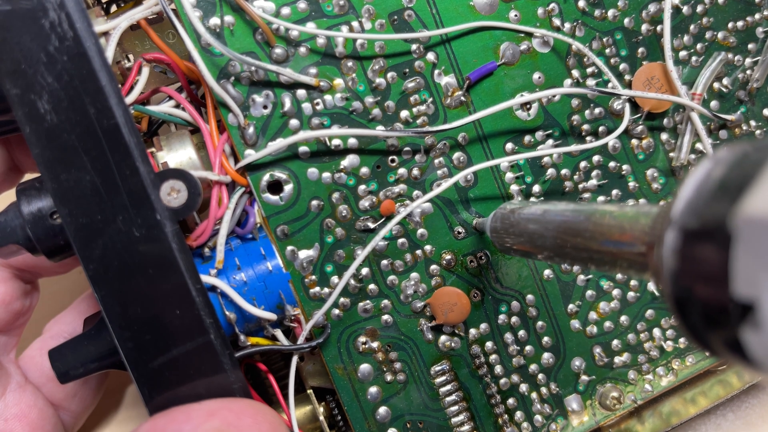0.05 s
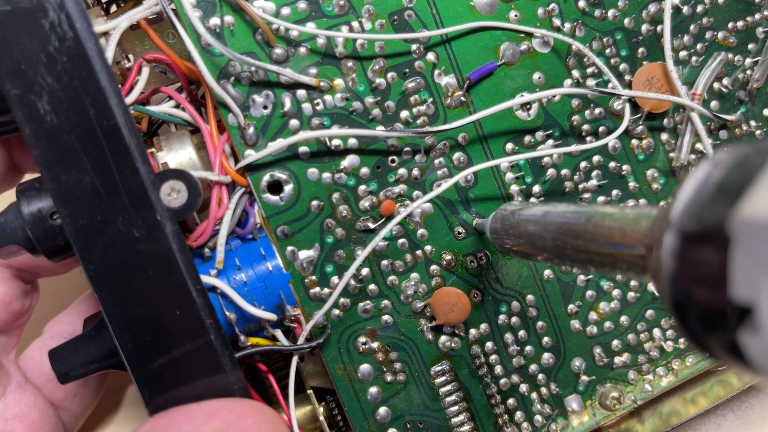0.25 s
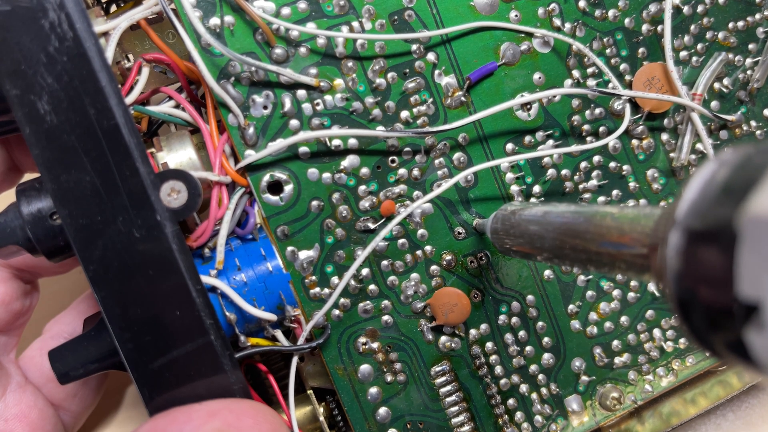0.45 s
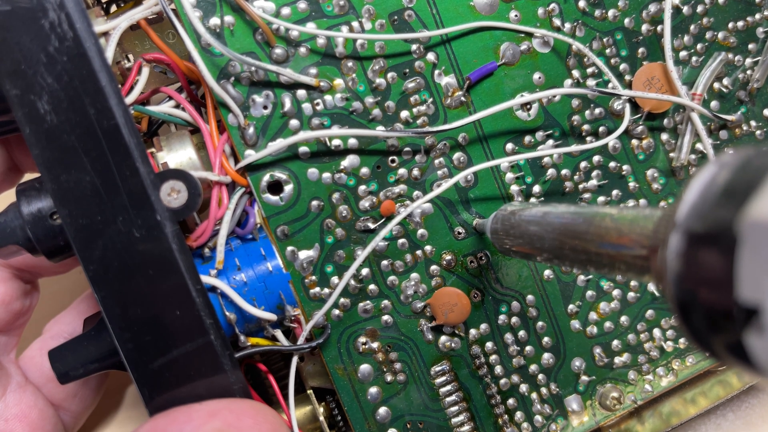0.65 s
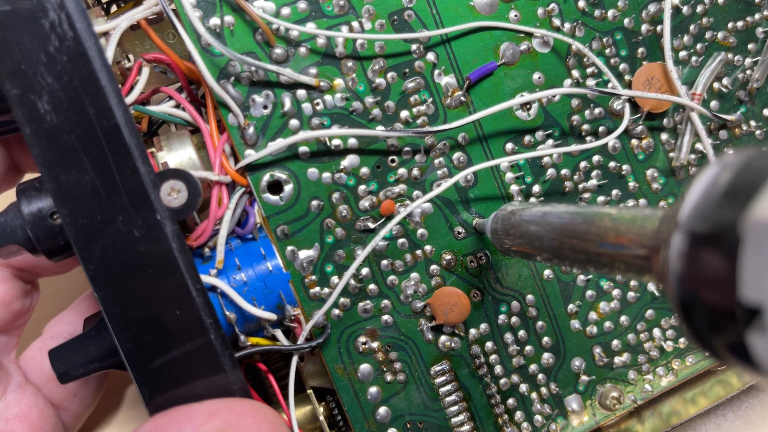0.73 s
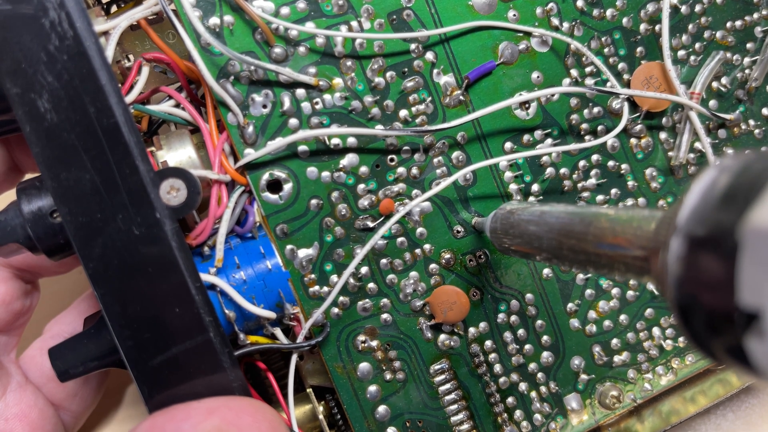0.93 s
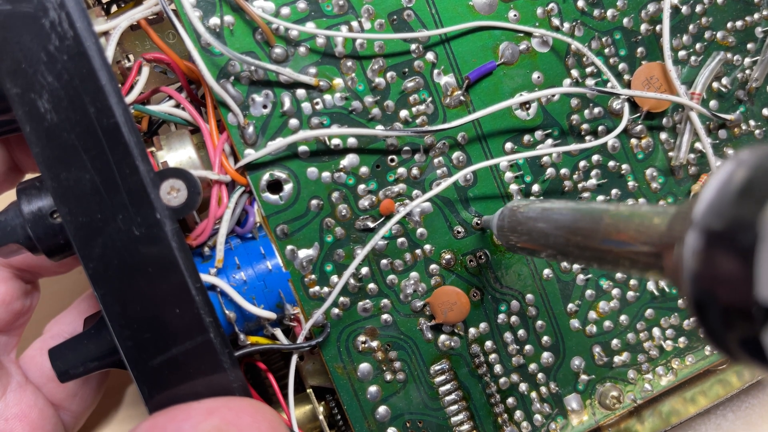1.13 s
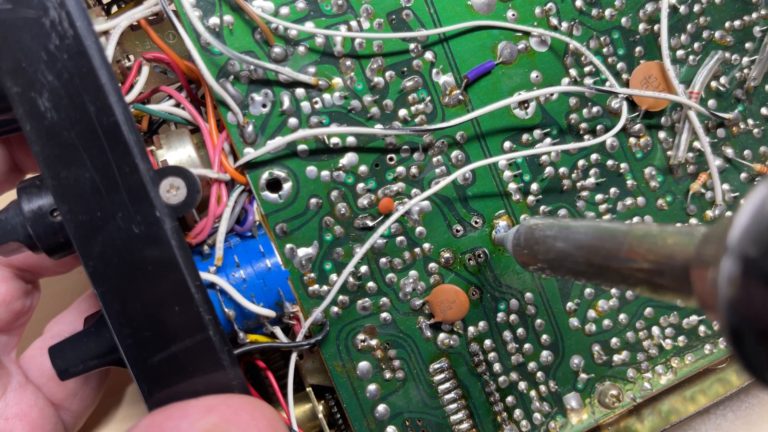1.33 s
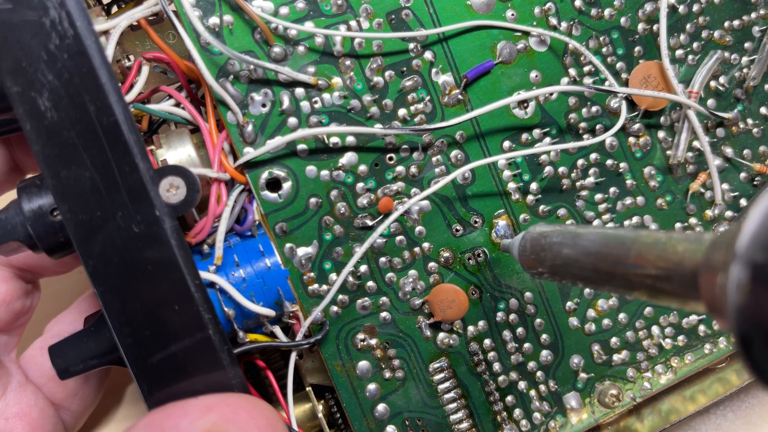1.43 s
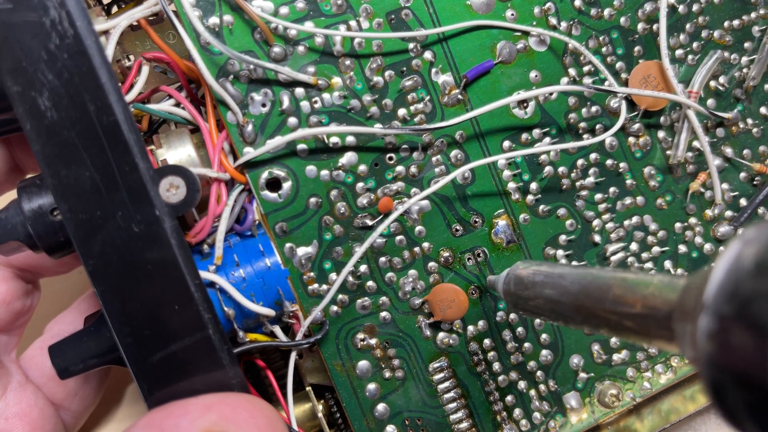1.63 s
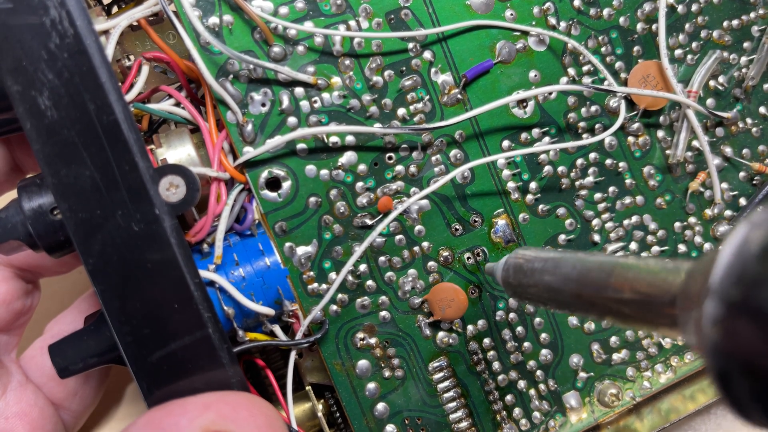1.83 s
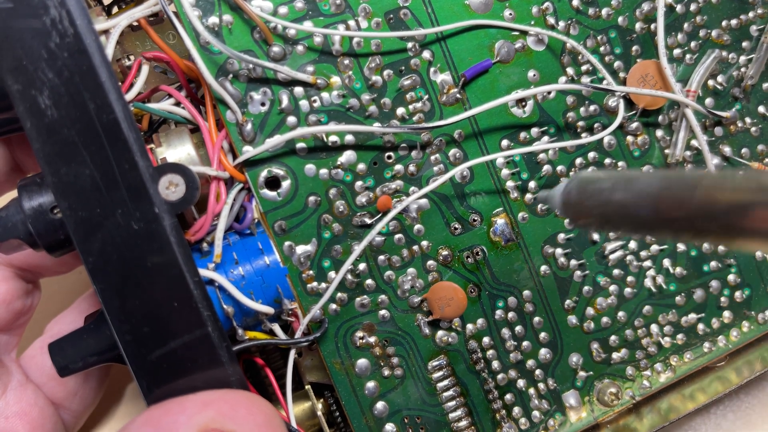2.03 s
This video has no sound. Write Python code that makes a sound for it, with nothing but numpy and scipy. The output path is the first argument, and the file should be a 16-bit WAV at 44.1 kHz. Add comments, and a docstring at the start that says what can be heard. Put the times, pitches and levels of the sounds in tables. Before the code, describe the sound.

In a quiet workshop, a trigger click starts a desoldering gun's short buzzing hum and suction hiss, ended by a sharper click.

```python
"""Low room rumble in a quiet workshop, then faint handling ticks: a desoldering gun, close to the mic.
Its trigger clicks; a small diaphragm pump spins up, hums, buzzes its case and rings its valves,
while air hisses through the nozzle and solder spits from one joint on a circuit board.
The trigger snaps back and the pump coasts to rest, leaving the room and a faint high whine."""
import sys
import numpy as np
from scipy import signal
from scipy.fft import rfft, irfft, next_fast_len
from scipy.io import wavfile
from scipy.ndimage import map_coordinates

SR = 44100
rng = np.random.default_rng(int(sys.argv[2]) if len(sys.argv) > 2 else 0)


def master_out(mix):
    """Clip the mix to full scale and print it as 16-bit PCM to the path in sys.argv[1]."""
    frames = np.transpose(np.atleast_2d(mix))
    ceiling = np.clip(frames, -1, 1)
    pcm = np.round(ceiling * 32767).astype(np.int16)
    wavfile.write(sys.argv[1], SR, pcm)


N = 91507

POWER_ON_S, POWER_OFF_S = .649, 1.078  # the motor has power from press to release


def amp(db):
    """Decibels to gain."""
    return 10 ** (np.asarray(db) / 20)


def unit(x):
    """x at rms 1."""
    return x / np.sqrt(np.mean(x ** 2) + 1e-20)


def wobble(rate):
    """A smooth random curve, rate knots a second."""
    return map_coordinates(rng.standard_normal(int(N * rate / SR) + 4), [np.arange(N) * rate / SR])


def filtered(x, response):
    """x through a complex response of frequency."""
    size = next_fast_len(N + SR // 2)
    return irfft(rfft(x, size) * response(np.fft.rfftfreq(size, 1 / SR)), size)[:N]


def noise(spectrum):
    """Noise of rms 1, coloured by points of f/Hz, relative level/dB."""
    f, db = np.transpose(spectrum)
    white = rng.standard_normal(N)
    return unit(filtered(white, lambda hz: amp(np.interp(np.log(hz + 1), np.log(f), db))))


def ring(x, modes):
    """x through resonances of f/Hz, width/Hz, gain/dB."""
    return filtered(x, lambda f: sum(amp(db) * 1j * f * width / (hz * hz - f * f + 1j * f * width)
                                     for hz, width, db in modes))


def burst(s, t60, attack):
    """An envelope that swells at time s and dies away; all in seconds."""
    age = np.maximum(np.arange(N) / SR - s, 0)
    return (1 - np.exp(-age / attack)) * np.exp(-np.log(1000) * age / t60)


def workshop():
    """Room tone: low rumble, soft fan noise, wavering tones and a faint high whine that sets in late."""
    # rumble and fan noise: f/Hz, relative level/dB
    room_spectrum = [(10, -1), (25, 1), (45, -15.5), (75, -22), (130, -21), (270, -23.5), (345, -17),
                     (430, -25.5), (800, -31.5), (1300, -35.5), (1750, -32.5), (3000, -44.5), (5500, -49),
                     (16000, -51)]
    # steady tones in the room: f/Hz, rms level/dB
    room_tones = [(119.5, -71), (376.8, -67.5), (597.5, -79.5)]
    t = np.arange(N) / SR
    tones = sum(amp(db + wobble(16)) * unit(np.sin(2 * np.pi * hz * t + 0.41 * wobble(12)))
                for hz, db in room_tones)
    whine = amp(-90) * np.clip((t - 1.3) / .05, 0, 1) * np.sin(2 * np.pi * 12801 * t)
    return amp(-52.5) * noise(room_spectrum) + tones + whine


def handling():
    """The gun ticks dully in the hand while the joint heats."""
    # handling ticks: t/s, level/dB
    ticks = [(0.356, -56.5), (0.386, -62), (0.423, -62.5)]
    envelope = sum(amp(db) * burst(s, t60=0.05, attack=0.001) for s, db in ticks)
    return envelope * noise([(400, -24), (900, 10.5), (2600, 3.5), (4000, -10), (9000, -33)])


def trigger():
    """The switch snaps over and chatters once: a crack, a ring, a lever clack, a knock in the handle."""
    # press and release: t/s, overall gain/dB, handle knock/dB, lever clack/dB, second contact/share
    snaps = [(0.6487, -37.5, -11.5, 2, 0.66), (1.0718, -32, -1.5, -10, 0.23)]
    # modes of the switch spring and housing: f/Hz, relative level/dB, t60/s
    switch_modes = [(5200, -4, .014), (5500, -9, .012), (6350, -7, .018), (7620, -6, .011), (9080, -6, .01),
                    (10950, -5, .01), (11000, -28, .12), (14500, -9, .006), (15550, -11, .012)]
    t = np.arange(N) / SR
    out = np.zeros(N)
    for s, db, knock_db, lever_db, rebound in snaps:
        spring = sum(amp(level) * burst(s, t60, attack=.00036)
                     * np.sin(2 * np.pi * (hz * t + rng.random())) for hz, level, t60 in switch_modes)
        contacts = burst(s, t60=.0065, attack=.0003) + rebound * burst(s + .0007, t60=.0065, attack=.0003)
        crack = noise([(700, -33), (1800, -14), (3200, -10), (4100, -3), (5200, 2), (11000, 7),
                       (16000, -3.5)])
        lever = noise([(1200, -30), (1900, 4), (2350, -4), (2800, -2), (3600, -10), (4300, -30)])
        handle = noise([(500, -18), (1250, -1), (1750, 0), (2100, -2), (3000, -17), (4700, -9),
                        (6500, -25)])
        click = contacts * (amp(4.5) * crack + amp(lever_db) * lever)
        knock = burst(s + .0005, t60=.02, attack=.0003) * handle
        out += amp(db) * (amp(3.5) * spring + click + amp(knock_db) * knock)
    return out


def bench(x):
    """Short reflections reach the mic from the bench and the walls."""
    tail = burst(0.0008, t60=0.12, attack=0.0012) * rng.standard_normal(N)
    return signal.fftconvolve(x, tail / np.linalg.norm(tail))[:N]


def coasting():
    """Seconds since the power was cut, 0 before that."""
    return np.maximum(np.arange(N) / SR - POWER_OFF_S, 0)


def shaft_speed():
    """Turns per second: the motor spins up, creeps a little faster, and coasts once the power is cut."""
    run_hz, creep_hz_per_s = 82.15, 15.1
    spin_up_s, coast_s = .059, .143  # time constants
    powered_s = np.clip(np.arange(N) / SR, POWER_ON_S, POWER_OFF_S) - POWER_ON_S
    driven = (run_hz + creep_hz_per_s * powered_s) * np.tanh(powered_s / spin_up_s)
    return driven * np.exp(-coasting() / coast_s)


def pump():
    """One shaft drives hum, buzz, rasp and suction; the diaphragm's effort runs from 0 to 1."""
    idle_hz = 41.3  # below this shaft speed the diaphragm moves no air
    speed = shaft_speed()
    turns = np.cumsum(speed) / SR
    effort = np.maximum(speed - idle_hz, 0) / (speed.max() - idle_hz)
    return hum(speed, effort, turns) + buzz(effort, turns) + rasp(speed) + suction(effort)


def rasp(speed):
    """The linkage scrapes as the shaft passes through a slow speed, spinning up and coasting down."""
    rasp_hz, spread_hz = 47, 6
    slow = np.exp(-.5 * ((speed - rasp_hz) / spread_hz) ** 2)
    scrape = noise([(900, -10.5), (1400, -6.5), (1800, 3.5), (2400, -24), (3200, -18), (3900, -5.5),
                    (5000, -20)])
    return amp(-60) * slow * scrape


def hum(speed, effort, turns):
    """The crank shakes the gun; its upper overtones need full speed, and the room rings on after it."""
    # shaking of the pump: multiple of the shaft speed, relative level/dB
    harmonics = [(1, -19.5), (2, -4), (3, -11), (4, -4), (6, -20.5), (7, -22.5)]
    # low modes of the room: f/Hz, width/Hz, gain/dB
    room_modes = [(118.8, 3.7, 11), (135.8, 7.9, 4.5), (174.6, 7.4, 2), (348.5, 2.9, 2.5)]
    force = (speed / speed.max()) ** 5
    shake = effort ** 0.88 * sum(amp(db) * (force if k > 2 else 1) * np.cos(2 * np.pi * k * turns)
                                 for k, db in harmonics)
    # below full speed the gun shudders loosely
    loose = noise([(60, -51), (110, -7.5), (220, -8), (380, -6), (550, -22.5), (750, -15), (1500, -41)])
    shudder = effort * (1 - force) * loose
    return amp(-44.5) * (shake + ring(shake, room_modes) + shudder)


def strokes(turns, scatter_db, jitter_s=8e-6):
    """One impulse at each whole turn, a little uneven in size and time."""
    whole = np.arange(np.ceil(turns[0]), turns[-1])
    chance = rng.standard_normal((len(whole), 2))
    at = np.interp(whole, turns, np.arange(N)) + jitter_s * SR * chance[:, 0]
    taps = at.astype(int)[:, None] + np.arange(-7, 9)  # a windowed sinc puts each between samples
    pulses = np.sinc(taps - at[:, None]) * np.hanning(taps.shape[1]) * amp(scatter_db * chance[:, 1:])
    return np.bincount(np.clip(taps, 0, N - 1).ravel(), pulses.ravel(), N)


def vacuum(db_per_s):
    """A gain that drifts as the vacuum builds, 1 halfway through the run."""
    t = np.clip(np.arange(N) / SR, POWER_ON_S, POWER_OFF_S)
    return amp(db_per_s * (t - (POWER_ON_S + POWER_OFF_S) / 2))


def running(x):
    """x at rms 1 over the time that the motor has power."""
    return x / np.std(x[round(POWER_ON_S * SR):round(POWER_OFF_S * SR)])


def buzz(effort, turns):
    """Valves, linkage and case each swell as an overtone of the shaft passes one of their resonances."""
    knocks = strokes(turns, scatter_db=-0.5)  # the piston, once a turn
    parts = (amp(-50.5) * valves(effort, turns) + amp(-57) * linkage(effort, knocks)
             + amp(-52) * case(effort, turns, knocks))
    slack_db_per_s = -110  # without the motor behind them, knocks and slaps fade faster than the speed
    return amp(slack_db_per_s * coasting()) * parts


def valves(effort, turns):
    """Intake and exhaust valves slap in turn and ring their chamber, quieter as the vacuum builds."""
    # resonances of the valve chamber: f/Hz, width/Hz, relative gain/dB
    chamber_modes = [(2397, 38, 7.5), (2548, 64, -0.5)]
    intake = strokes(turns, scatter_db=0)
    exhaust = strokes(turns - .447, scatter_db=1)
    slaps = (intake + 0.027 * exhaust + 0.012 * rng.standard_normal(N)) * effort * vacuum(db_per_s=-4.5)
    chamber = ring(slaps, chamber_modes)
    return running(ring(chamber, [(2434, 170, 0)]))  # the chamber passes only a narrow band


def linkage(effort, knocks):
    """The piston linkage rings at each knock and rattles with loose play in between."""
    # resonances of the linkage: f/Hz, width/Hz, relative gain/dB
    linkage_modes = [(1352, 26, 3.5), (1477, 24, 3), (1609, 100, -4), (1716, 20, 6), (1877, 32, 2),
                     (1870, 26, -0.5), (2290, 160, 9.5)]
    play = 0.026 * rng.standard_normal(N)
    rattle = (knocks + play) * effort * vacuum(db_per_s=-1)
    ringing = ring(ring(rattle, linkage_modes), [(1840, 550, 0)])
    lowpass = signal.butter(6, 1820, fs=SR, output="sos")
    return running(signal.sosfilt(lowpass, ringing))


def case(effort, turns, knocks):
    """The case rings with the piston's knocks and the motor's whine, at 11 times the shaft speed."""
    # resonances of the case: f/Hz, width/Hz, relative gain/dB
    case_modes = [(747, 20.3, 7.5), (937, 7.2, -0.5), (984.8, 41.5, 3.5), (1043, 19, 1.5)]
    whine = amp(-50) * effort * np.cos(2 * np.pi * 11 * turns)
    ringing = ring((knocks + whine) * effort ** 0.4, case_modes)
    return running(ring(ringing, [(962, 107, 0)]))


def suction(effort):
    """Air gathers speed and rushes smoothly through the nozzle."""
    # air in the nozzle: f/Hz, relative level/dB
    hiss_spectrum = [(250, -5), (1200, -6), (2000, -4), (3200, -3), (4800, -6), (6000, -2), (7600, -1),
                     (8300, 6), (8900, 6), (9400, -1), (10100, -5), (11200, 3.5), (11800, -3),
                     (12400, -1.5), (12900, -10), (13500, -1), (15700, -2)]
    draw_s = 0.038  # time constant with which the air gets moving
    drawn = 1 - np.exp(-np.maximum(np.arange(N) / SR - POWER_ON_S, 0) / draw_s)
    return amp(-53.5) * drawn * effort ** 0.28 * noise(hiss_spectrum)


def solder():
    """Drops of solder spit as they are pulled up the nozzle."""
    # spits: t/s, relative level/dB
    spits = [(0.8265, -37), (0.9035, -35.5)]
    envelope = sum(amp(db) * burst(s, t60=0.0055, attack=0.00022) for s, db in spits)
    crackle = noise([(1200, -20), (2900, 2), (4300, -1), (6300, 1), (10000, -1), (16000, -4)])
    return amp(2) * envelope * crackle


def scene():
    """The gun close to one microphone at the bench, with the workshop behind it."""
    clicks = trigger()
    gun = pump() + solder() + handling() + clicks
    return (gun + amp(-17.5) * bench(clicks) + workshop())[None]


def record(dry):
    """The mono microphone channel cuts off steeply at the top of its band."""
    top_hz = 15900
    return filtered(dry[0], lambda hz: 1 / np.sqrt(1 + (hz / top_hz) ** 200))[None]


dry = scene()
out = record(dry)
master_out(out)
```